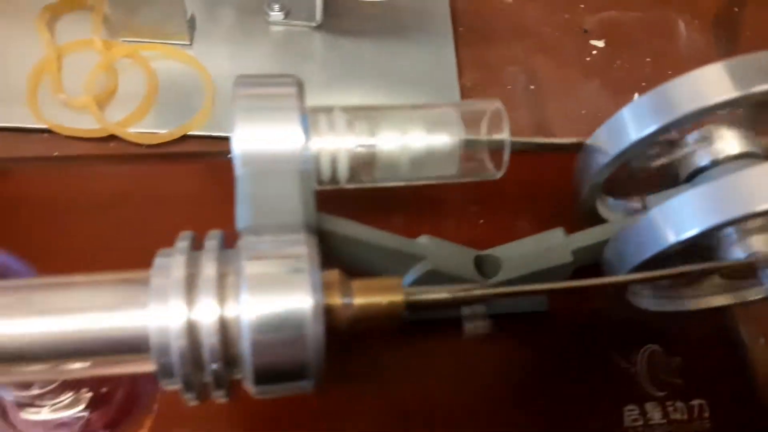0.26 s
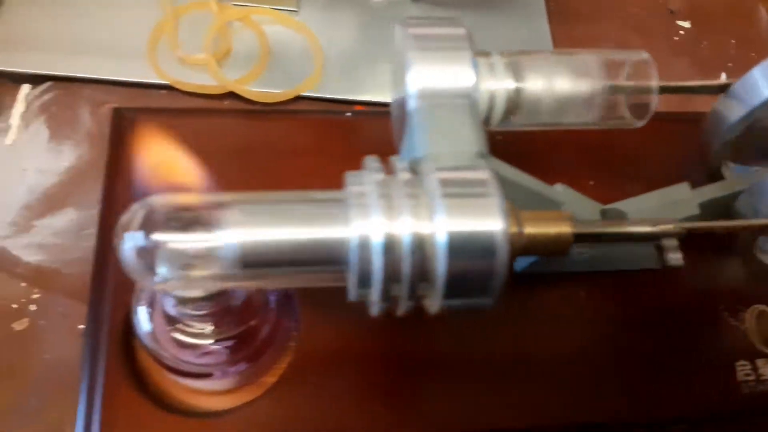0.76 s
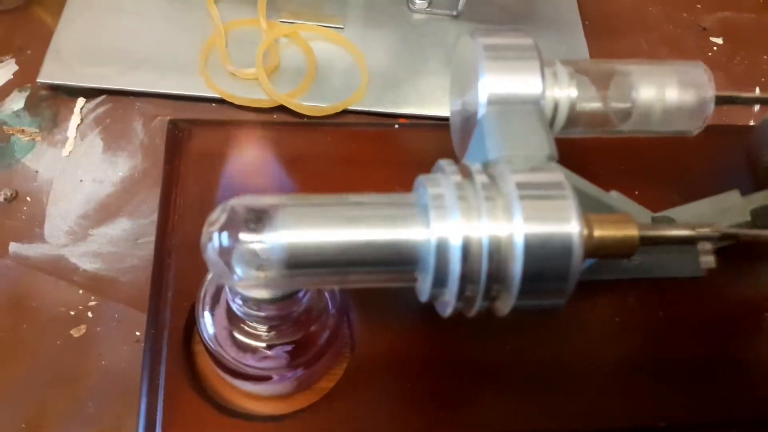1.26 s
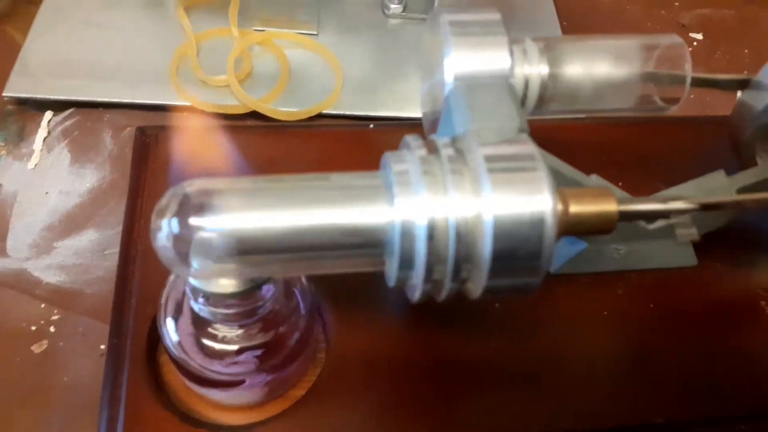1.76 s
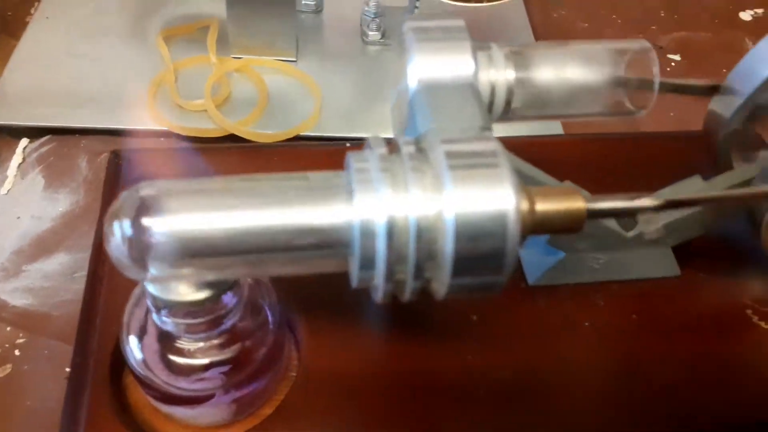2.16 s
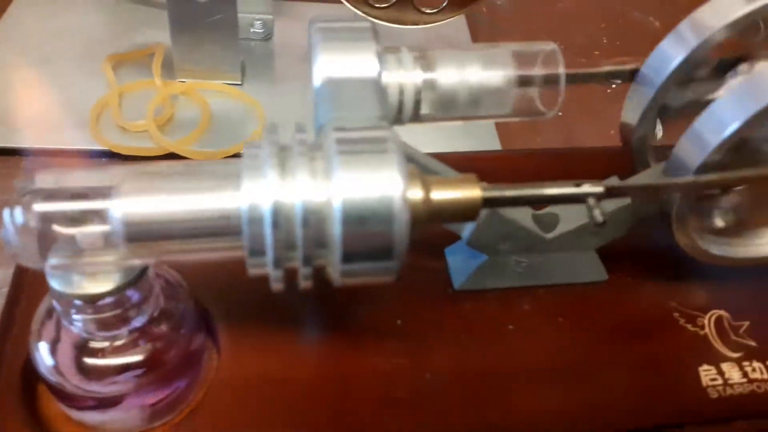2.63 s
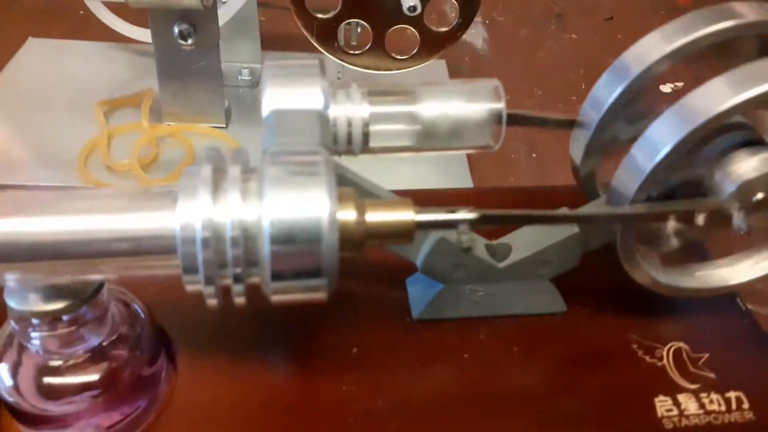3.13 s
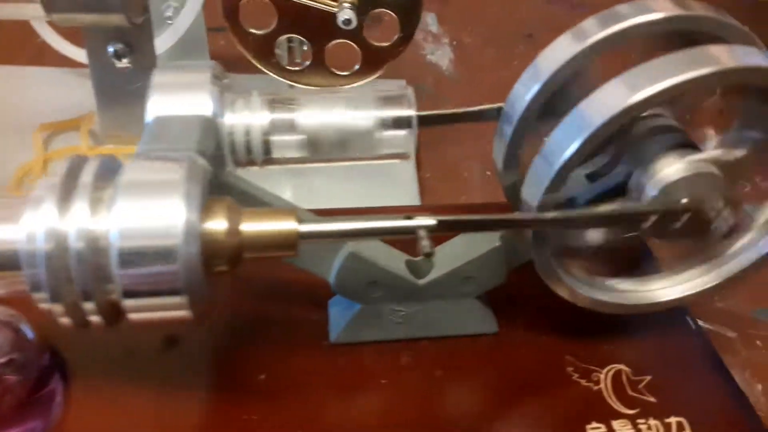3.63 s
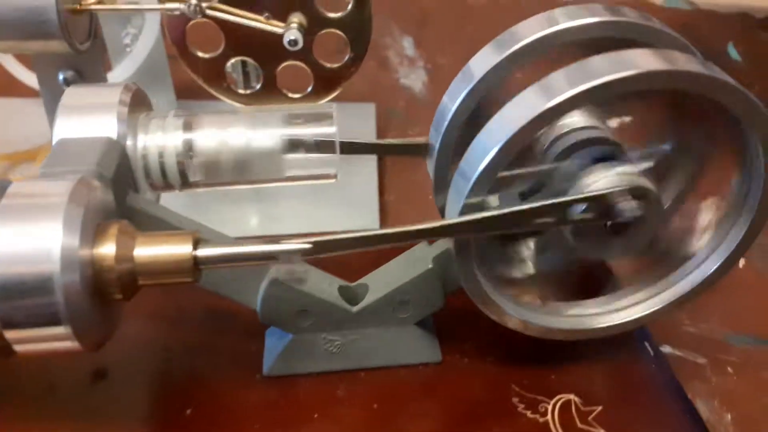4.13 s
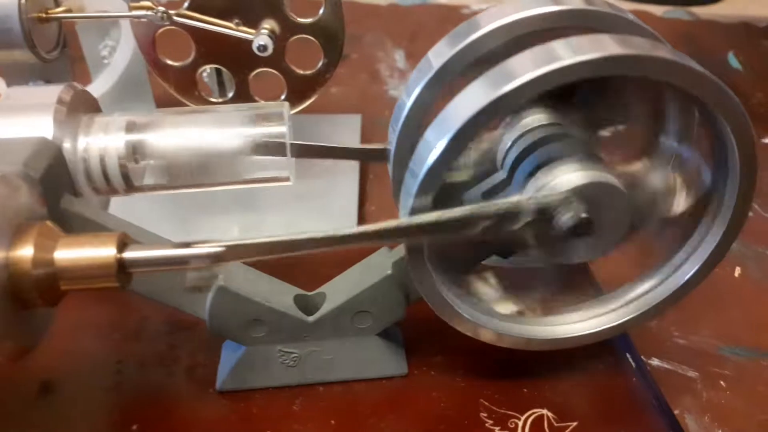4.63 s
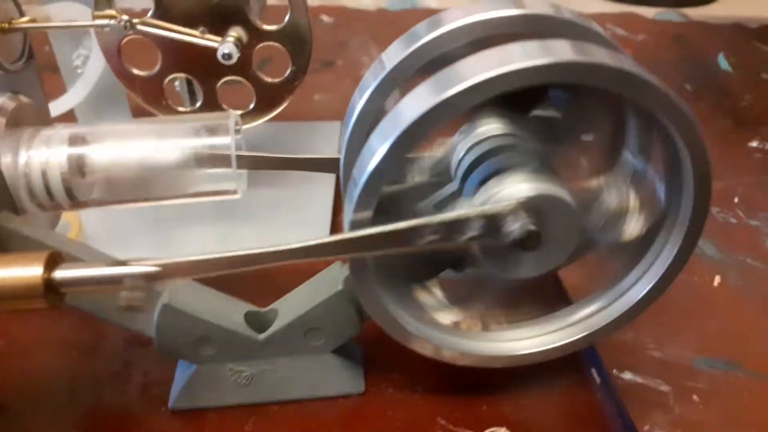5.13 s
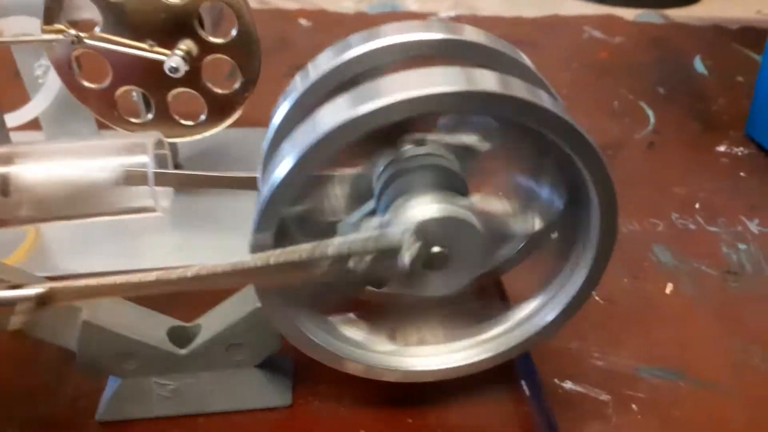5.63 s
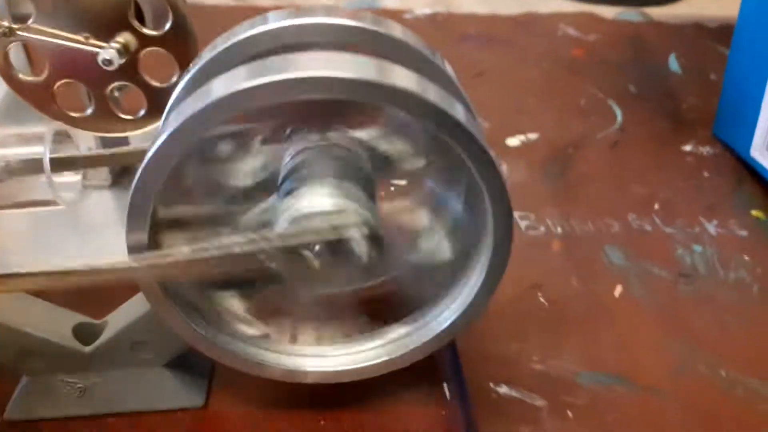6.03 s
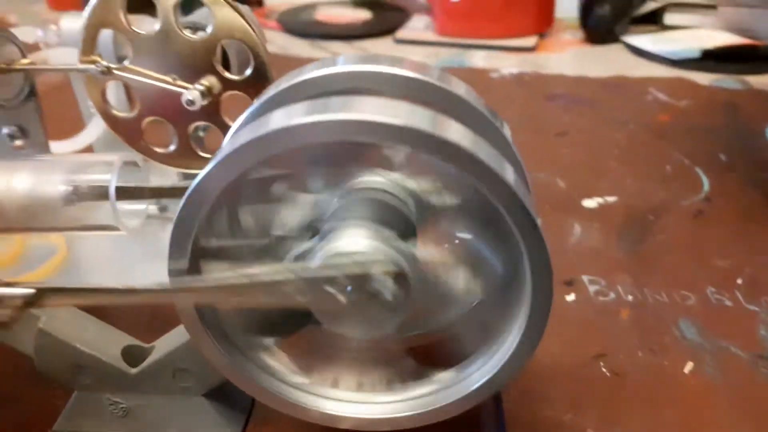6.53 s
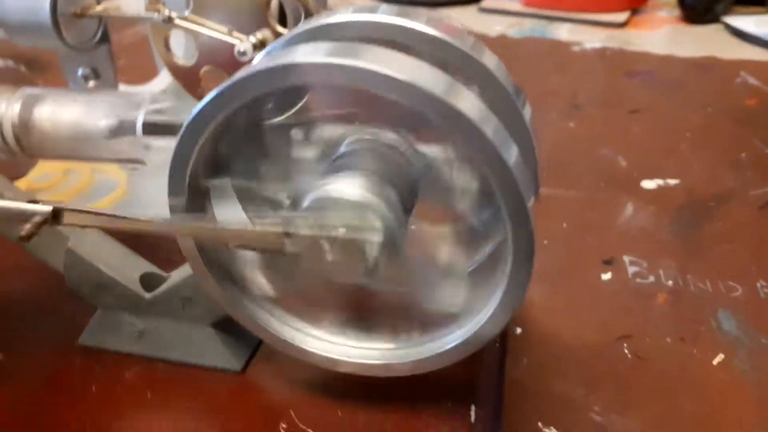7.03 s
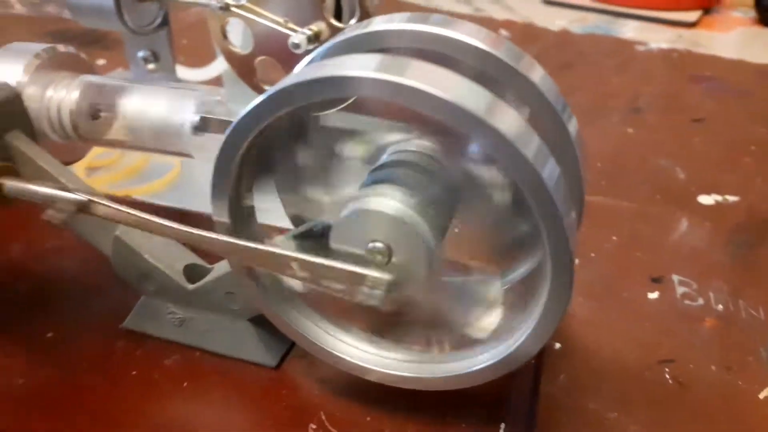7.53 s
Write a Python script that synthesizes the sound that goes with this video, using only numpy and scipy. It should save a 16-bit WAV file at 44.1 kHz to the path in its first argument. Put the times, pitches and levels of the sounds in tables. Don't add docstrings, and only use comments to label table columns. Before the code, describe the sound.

A small hot air engine runs continuously from start to end, about 8 seconds, in a small room with a short, dull reverberation. At 0 s the phone is near the burner: bright, uneven metal knocks at roughly nine per second, two per turn, over a faint steady hiss. Between knocks the loose linkage chatters in tiny ticks and rebounds. Soft low puffs of air are clearest around 0.7 to 1.8 s. From 2.5 to 3.5 s the microphone passes the piston, and a hard, clear mid-high tap stands out. By 4 s the crank is close, louder and toward the left, and the pace quickens to about twelve knocks per second. More puffs come around 5.3 to 5.8 s. Near 7 s it is loudest and densest, with low wooden thuds and a thin flywheel ring, reaching over thirteen knocks per second, then drawing back slightly while still running.

```python
import sys
import numpy as np
from scipy import signal
from scipy.fft import rfft, irfft
from scipy.io import wavfile
from scipy.ndimage import uniform_filter1d

SR = 44100
rng = np.random.default_rng(int(sys.argv[2]) if len(sys.argv) > 2 else 0)


def store_pcm(level_fs):
    pcm = np.round(np.clip(level_fs, -1, 1) * 32767).astype(np.int16)
    wavfile.write(sys.argv[1], SR, np.atleast_2d(pcm).T)


def voltage_ratio(level):
    return 10 ** (np.asarray(level, float) / 20)


N = 343084


def engine():
    s, speed = strokes()
    # t/s, nearness to crank/dB, nearness to flywheels/dB, rim ring/dB, left minus right/dB
    drift = [
        (0, -9, -11.5, -41, 5),
        (.8, -6.5, -16.5, -41, 5),
        (1.798, -7, -8.5, -36, 0.5),
        (2.598, -6, -9, -34, .5),
        (3.3, -1.5, -12, -34, 4.5),
        (4.1, 2.5, -4, -37, 9.5),
        (5.2, 2.5, -4, -38, 10),
        (6.198, 0, -3, -38, 10),
        (7.099, 3.5, 1, -34, 8.5),
        (7.78, 1.5, -0.5, -37, 8),
    ]
    when, *columns = np.transpose(drift)
    crank_db, wheel_db, rim_db, pan_db = (np.interp(s, when, c) for c in columns)
    loose = chatter(len(s), forward_s=.036, back_s=.03, scatter_db=6.5)
    return (linkage(s, speed, crank_db, wheel_db, pan_db, loose) + flywheels(s, wheel_db, rim_db, pan_db, loose)
            + board(s, wheel_db, pan_db) + table_rumble(s, wheel_db))


def strokes():
    # t/s, speed/(turns per s)
    flywheel_speed = [(0, 4.715), (.21, 4.596), (.56, 4.46), (.89, 4.797), (1.15, 4.69), (2.28, 5.026),
                      (2.3, 4.877), (2.77, 5.039), (3.2, 5.041), (3.61, 5.171), (3.83, 5.308),
                      (4.56, 5.964), (4.85, 6.086), (5.81, 5.795), (6.36, 5.913), (7.16, 6.412),
                      (7.23, 6.52), (7.78, 6.771)]
    first_knock_s, back_turns = .0651, .49
    t = np.arange(N) / SR
    speed = np.interp(t, *np.transpose(flywheel_speed))
    turns = np.cumsum(speed) / SR
    turns = turns - np.interp(first_knock_s, t, turns)
    k = np.arange(int(2 * turns[-1]) + 1)
    s = np.interp(k // 2 + k % 2 * back_turns, turns, t)
    return s, np.interp(s, t, speed)


def linkage(s, speed, crank_db, wheel_db, pan_db, loose):
    # f/Hz, width/Hz, level/dB
    pin_modes = [(10720, 2020, -13.5), (12810, 700, -3), (13550, 1170, -11.5)]
    rod_modes = [(4373, 650, -10.5), (6550, 1200, -9.5), (8175, 1440, -18.5), (9965, 880, 6.5)]
    cylinder_modes = [(1516, 180, -0.5), (2358, 203, -7.5), (2580, 370, -6), (3390, 4020, -9)]
    base_modes = [(281, 410, -13.5), (586.3, 147, -4), (720, 44.3, 0), (803, 67, -2), (1063, 580, -9)]
    # forward level/dB, back level/dB, forward and back share of crank nearness [dB/dB],
    # forward and back share of flywheel nearness [dB/dB], scatter/dB
    pin_knock = (-8.5, -10.5, 1.22, 0.95, -0.3, -0.7, 1)
    rod_knock = (-25.5, -22.5, 1.7, -0.78, -0.57, 0.32, 0.5)
    cylinder_knock = (-26.5, -29.5, -0.1, -0.18, 0.24, -.5, 1.5)
    base_knock = (-31.5, -39.5, 0.75, -0.82, 0.15, 0.42, 2)
    piston_knock = (3, -12, 0, 0, 0, 0, 1)
    collar_knock = (-6, -20, -.1, 0, 0, 0, 1)
    crank_knock = (-10.5, -12.5, 2.4, 1.5, -1.45, -1, 0)
    frame_knock = (-15.5, -12.5, 1.33, 0.2, -1.34, -0.5, 2)
    # t/s, metal level/dB, body level/dB
    accents = [(.065, -7, 3.5), (.17, 2.5, -1.5), (.282, -4, 1.5), (.39, 2.5, -1.5), (.501, 7, 7.5),
               (.723, 4, 3.5), (.828, -12, -3), (.935, -11, 2.5), (1.25, -1.5, 0.5), (1.359, -4, -1),
               (1.774, 0, 3.5), (2.179, 6, 3), (2.381, 1, -3.5), (2.48, 4, -1), (2.88, 1, 0.5),
               (2.981, 0, 3.5), (3.277, 1, 3), (3.951, 4, 5), (4.041, 4.5, 2.5), (4.31, -5, 1),
               (4.65, -4, -0.5), (5.396, 3.5, -1.5), (5.653, -1, 1.5), (6.168, -1.5, 0.5), (6.994, 3.5, 2),
               (7.151, 2.5, 0.5), (7.226, 0, 2), (7.457, -3.5, -1.5)]
    # f/Hz, width/Hz, lead of the left port [rad]
    piston = (2720, 230, .7)
    collar, crank, frame = (5510, 2000, 3.64), (8220, 820, 3.65), (1030, 820, 0.48)
    passed_s, reach_s = 3.1, 1.2
    small_lag_s = .0009

    count = len(s)
    back = np.arange(count) % 2
    tick_s, tick_db, tick_body_db = rebounds(s, speed, crank_db)
    tick_pan_db = np.interp(tick_s, s, pan_db)
    accent_db = np.zeros((count, 2))
    accent_db[[np.argmin(abs(s - row[0])) for row in accents]] = np.array(accents)[:, 1:]
    metal_db, body_db = accent_db.T

    def knock(rule, extra_db):
        db, crank_share, wheel_share = np.reshape(rule[:-1], (-1, 2))[:, back]
        scatter_db = rule[-1] * rng.standard_normal(count)
        return db + crank_share * crank_db + wheel_share * wheel_db + extra_db + scatter_db

    def push(db, rebound_db, loose_db, width, unlike, decay_s, rise_s, tap=0., lag_s=0.):
        hit = bursts(count, size=600, decay_s=decay_s, rise_s=rise_s, scatter_db=8.0)
        hit = np.sqrt(1 - tap) * hit + np.sqrt(tap) * signal.unit_impulse(hit.shape[1], idx=24)
        tick = bursts(len(tick_s), size=300, decay_s=.8 * decay_s, rise_s=.7 * rise_s, scatter_db=4)
        usual_db = uniform_filter1d(db, size=9)
        blows = place(s + lag_s * (1 - back), db, width * pan_db, hit, unlike)
        ticks = place(tick_s, tick_db + rebound_db, width * tick_pan_db, tick, unlike)
        return blows + ticks + place(s, usual_db + loose_db, width * pan_db, loose, unlike)

    pin = push(knock(pin_knock, metal_db) + 17.0, 21.9, -17.0, 1.3, 0.33,
               decay_s=0.0012, rise_s=0.00025, lag_s=small_lag_s)
    rod = push(knock(rod_knock, body_db) + 22.5, 13.1, -13.5, 0.81, 0.26, decay_s=0.0038, rise_s=0.00059)
    cylinder = push(knock(cylinder_knock, body_db) + 23, tick_body_db + 15.5, -9.0, 0.88, 0.27,
                    decay_s=0.0075, rise_s=0.00095)
    base = push(knock(base_knock, body_db) + 28.5, tick_body_db + 16.5, 1.0, 0.54, 0.043,
                decay_s=0.0063, rise_s=0.00025)
    parts = ring(pin, pin_modes, 0.55, 11400, 16490) + ring(rod, rod_modes, 3.77, 1860, 10900)
    parts = parts + ring(cylinder, cylinder_modes, 0.4, 740, 3780) + ring(base, base_modes, 0.044, 224.0, 1190)

    passing_db = -10 * np.log10(1 + ((s - passed_s) / reach_s) ** 2)
    for (hz, width_hz, lead), rule, extra_db, rebound_db, unlike, tap in [
            (piston, piston_knock, passing_db, 4, 0, .9), (collar, collar_knock, 0, 4, .12, .4),
            (crank, crank_knock, body_db, 12, .12, .4), (frame, frame_knock, body_db, 5, .12, .4)]:
        blow = push(knock(rule, extra_db), rebound_db, -24, 1.1, unlike,
                    decay_s=0.0036, rise_s=0.00015, tap=tap, lag_s=small_lag_s)
        parts = parts + ring(blow, [(hz, width_hz, 0)], lead, 0.87 * hz, 1.53 * hz)
    return parts


def rebounds(s, speed, crank_db):
    # delay t/s, metal level/dB, share of crank nearness [dB/dB],
    # body minus metal level/dB
    forward = [
        (.012, -23.5, 0.45, -6),
        (.021, -27, .7, -6),
        (.0275, -22, 0.39, -8),
        (.032, -31, .1, -1.5),
    ]
    backward = [
        (.013, -31, .9, -2),
        (.0245, -30.5, 0.48, -16),
        (.034, -24, -0.24, -4),
        (.038, -34, 0.35, -2),
    ]
    jitter, scatter_db = .03, 3.2
    rule = np.array([forward, backward])[np.arange(len(s)) % 2]
    draw = rng.standard_normal(rule.shape)
    haste = (np.mean(speed) / speed)[:, None] ** 0.28
    when = s[:, None] + rule[..., 0] * haste * (1 + jitter * draw[..., 0])
    db = rule[..., 1] + rule[..., 2] * crank_db[:, None] + scatter_db * draw[..., 1]
    body_db = rule[..., 3] + scatter_db * draw[..., 2]
    return np.minimum(when, N / SR).ravel(), db.ravel(), body_db.ravel()


def chatter(count, forward_s, back_s, scatter_db):
    t = np.arange(3000) / SR
    draw = rng.standard_normal((count, 2, 3000))
    last_s = np.where(np.arange(count) % 2, back_s, forward_s)[:, None]
    clumps = np.repeat(draw[:, 1, :75], 40, axis=1)
    return draw[:, 0] * voltage_ratio(scatter_db * clumps - 32) / (1 + np.exp((t - last_s) / .005))


def flywheels(s, wheel_db, rim_db, pan_db, loose):
    # f/Hz, width/Hz, level/dB
    wheel_modes = [(1998, 14, 0), (14888, 35, -5), (15015, 34, -2), (15121, 34, 0), (15234, 35, -7)]
    count = len(s)
    low_db = -63 + 0.58 * wheel_db
    low = place(s, low_db + 29, .7 * pan_db, loose)
    thump = np.tile(np.hanning(9) / 4, (count, 1))
    low = low + place(s, low_db + 51 - 6 * (np.arange(count) % 2), 0.62 * pan_db, thump)
    rattle = loose + .018 * rng.standard_normal(loose.shape)
    high = place(s, rim_db + 27, .7 * pan_db, rattle, .2)
    click = bursts(count, size=300, decay_s=0.0009, rise_s=0.00018, scatter_db=-4)
    high = high + place(s, rim_db + 29, .7 * pan_db, click, 0.18)
    return ring(low, wheel_modes[:1], 2.0, 1400, 2600) + ring(high, wheel_modes[1:], 1.3, 14300, 20000)


def board(s, wheel_db, pan_db):
    # f/Hz, width/Hz, level/dB
    board_modes = [(337, 22, 0)]
    count = len(s)
    phase = 2 * np.pi * rng.random((count, 1))
    rocking = 0.039 * np.sin(2 * np.pi * board_modes[0][0] * np.arange(3000) / SR + phase)
    lean = (0.88 * rng.standard_normal((count, 3000)) + rocking) * np.hanning(3000)
    lean_db = -49.5 + 1.08 * wheel_db + 10.5 - 5 * (np.arange(count) % 2)
    return ring(place(s - .006, lean_db, 0.033 * pan_db, lean, 0.073), board_modes, 0.47, 284, 400)


def table_rumble(s, wheel_db):
    shake = rng.standard_normal((len(s), 4400)) * np.hanning(4400)
    rumble_db = -60 + 0.88 * wheel_db + 27.5
    return band(place(s - .012, rumble_db, 3 + 0 * s, shake, 0.13), 95.0, 444)


def puffs():
    # t/s, peak level/dB
    thuds = [(0.657, -41), (0.882, -37.5), (1.092, -35), (1.283, -37), (1.467, -41), (1.646, -42),
             (1.829, -41), (2.73, -45), (4.487, -43), (4.653, -43), (4.936, -42), (4.984, -40),
             (5.318, -37.5), (5.486, -59), (5.658, -35), (5.83, -34), (6.051, -42), (6.339, -55),
             (6.837, -44), (6.942, -39), (6.997, -39), (7.153, -67), (7.312, -39), (7.413, -36),
             (7.546, -39), (7.758, -41)]
    s, db = np.transpose(thuds)
    t = (np.arange(900) / SR - .01) / 0.001125
    wave = (1 - t ** 2) * np.exp(-.5 * t ** 2)
    return band(place(s - .011, db + 2.0, 5 + 0 * s, np.tile(wave, (len(s), 1))), 47, 750)


def room(x):
    level_db, t60_s, build_up_s = -9, 0.13, 0.022
    t = np.arange(9000) / SR
    tail = rng.standard_normal((2, 9000)) * np.exp(-np.log(1000) * t / t60_s) * (1 - np.exp(-t / build_up_s))
    tail = tail / np.sqrt(np.sum(tail ** 2) / 2)
    tail = colour(tail, [(200, 2), (1000, -0.5), (5000, 0.0), (15400, -8), (15900, -35)])
    return voltage_ratio(level_db) * signal.fftconvolve(x.mean(axis=0, keepdims=True), tail, axes=1)[:, :N]


def hiss():
    # f/Hz, level/dB per Hz
    hiss_colour = [(30, -35), (120, -12), (700, 1), (1500, -11), (4000, -16.5), (11000, -17), (15500, -11),
                   (15900, -45)]
    x = colour(rng.standard_normal((2, N)), hiss_colour)
    return voltage_ratio(-51) * x / np.std(x)


def place(times, db, pan_db, grain, unlike=0.):
    lag_s_per_db = -4.5e-5
    out = np.zeros((2, N + 5000))
    turned = np.where(rng.random(np.shape(grain)) < unlike, -1, 1) * grain
    for t, d, p, *pair in zip(times, db, pan_db, grain, turned):
        for g, port, side in zip(pair, out, (.5, -.5)):
            i = max(int((t + side * p * lag_s_per_db) * SR), 0)
            port[i:i + len(g)] += g * voltage_ratio(d + side * p)
    return out[:, :N]


def bursts(count, size, decay_s, rise_s, scatter_db):
    t = np.arange(size) / SR
    draw = rng.standard_normal((count, 2, size))
    g = draw[:, 0] * voltage_ratio(scatter_db * draw[:, 1]) * np.exp(-t / decay_s) * (1 - np.exp(-t / rise_s))
    return g / np.sqrt(np.sum(g ** 2, axis=1, keepdims=True))


def ring(push, modes, lead, lo_hz, hi_hz):
    out, energy = 0, 0
    for k, (hz, width_hz, db) in enumerate(modes):
        r = np.exp(-np.pi * width_hz / SR)
        pole = r * np.exp(2j * np.pi * hz / SR)
        out = out + (-1) ** k * signal.lfilter([voltage_ratio(db) * (1 - r)], [1, -pole], push)
        energy += voltage_ratio(2 * db) * (1 - r) / (1 + r) / 2
    turn = np.exp(1j * lead * np.array([[.5], [-.5]]))
    return band((out * turn).imag, lo_hz, hi_hz) / np.sqrt(energy)


def colour(x, points):
    hz, db = np.transpose(points)
    f = np.arange(x.shape[-1] // 2 + 1) * SR / x.shape[-1] + 1
    return irfft(rfft(x) * voltage_ratio(np.interp(np.log(f), np.log(hz), db)), x.shape[-1])


def band(x, lo_hz, hi_hz):
    return signal.sosfilt(signal.butter(2, [lo_hz, hi_hz], "band", fs=SR, output="sos"), x)


def scene():
    near = engine()
    return near + room(near) + puffs() + hiss()


def low_pass(x):
    return signal.sosfilt(signal.butter(12, 16850, fs=SR, output="sos"), x)


def record(dry):
    heard = colour(dry, [(20, 8.5), (70, -1.0), (15400, -4.5), (15900, -8), (16700, -22), (17000, -50)])
    return low_pass(np.clip(heard, -1, 1))


dry = scene()
out = record(dry)
store_pcm(out)
```